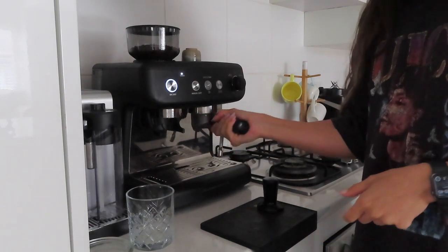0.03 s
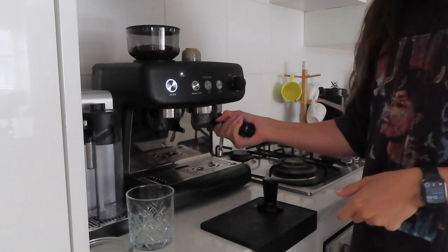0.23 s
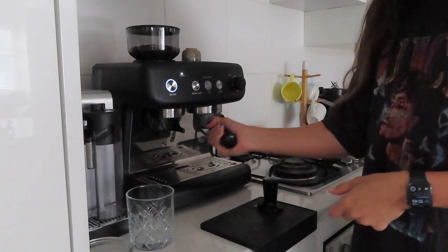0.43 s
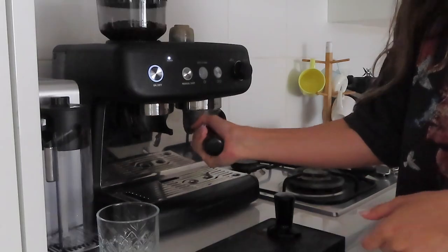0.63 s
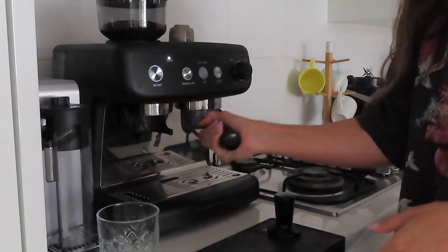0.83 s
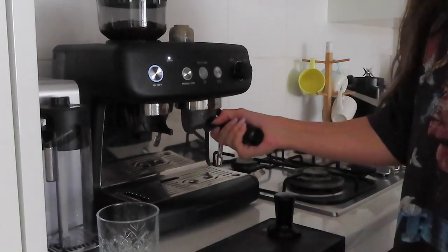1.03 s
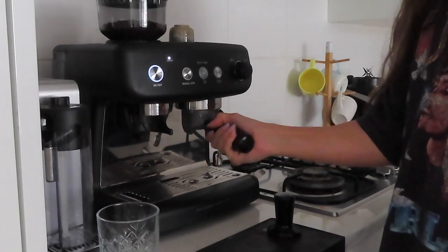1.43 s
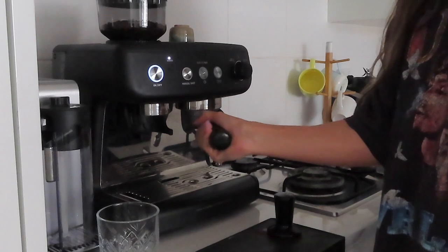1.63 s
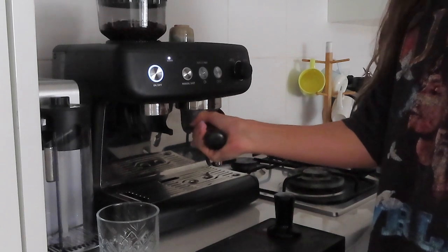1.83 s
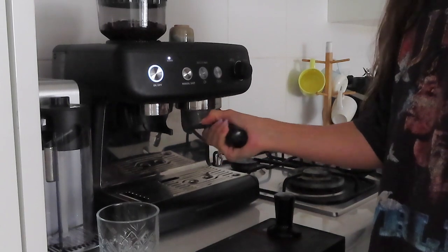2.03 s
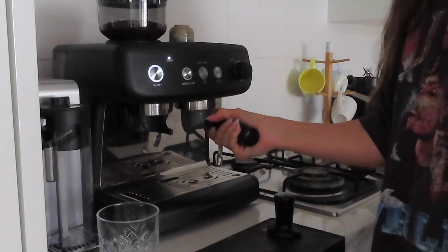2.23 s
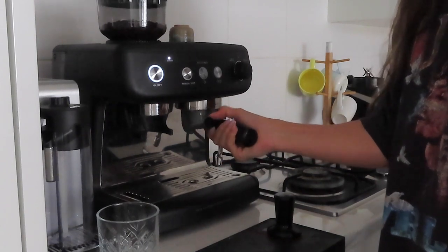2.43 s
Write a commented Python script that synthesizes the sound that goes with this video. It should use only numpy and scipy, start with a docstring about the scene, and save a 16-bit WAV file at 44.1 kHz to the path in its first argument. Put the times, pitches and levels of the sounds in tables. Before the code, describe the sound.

A metal portafilter clunks and knocks as it is locked into an espresso machine.

```python
"""A quiet, hard-walled kitchen, where a metal portafilter is fitted to an espresso machine.
It slides up with a faint rub of friction, clunks against the group head and knocks about until its
lugs seat. As it is twisted tight the seal ticks and the lugs slip and catch in a few dull bumps.
Impacts excite the damped modes of housing and basket; early reflections and reverberation follow,
over a steady low rumble and hiss."""
import sys
import numpy as np
from scipy import signal
from scipy.io import wavfile
from scipy.ndimage import uniform_filter1d

SR = 44100
rng = np.random.default_rng(int(sys.argv[2]) if len(sys.argv) > 2 else 0)


def generate_wav(sig):
    """Save sig (samples, or channels by samples) to the path in sys.argv[1] as 16-bit PCM at SR."""
    pcm = np.round(np.clip(np.atleast_2d(sig).T, -1, 1) * 32767).astype(np.int16)
    wavfile.write(sys.argv[1], SR, pcm)


N = 110250
AGE = np.arange(3 * SR // 4) / SR  # time since a contact, in seconds
BAND_EDGES_HZ = 22 * 2 ** (np.arange(20) / 2)

# background noise of the kitchen: frequency_hz, octave_level_db
AIR_SPECTRUM = [(25, -80), (35, -64.5), (50, -52), (75, -58), (110, -54), (160, -52.5), (300, -55),
                (700, -57), (1400, -60.5), (3000, -62.5), (6000, -65.5), (10000, -73), (15000, -79)]
# its stereo width: frequency_hz, side_to_mid_db
AIR_WIDTH = [(40, -25.5), (400, 0), (1500, -3), (3000, -3.5), (6000, -5.5), (12000, -3)]
# early reflections from counter and cupboards: frequency_hz, relative_to_direct_db
EARLY_LEVEL = [(100, -15.5), (700, -8.5), (2500, -16), (7000, 0.5), (14000, -4.5)]
# reverberation of the room: frequency_hz, relative_to_direct_db
ROOM_LEVEL = [(100, -5.5), (300, -6), (800, 1), (2000, -3), (4000, -6.5), (7500, -4), (14000, -15)]
# its decay: frequency_hz, t60_s
ROOM_T60 = [(100, 1), (260, 0.57), (700, 0.71), (1840, 0.53), (4850, 0.57), (12800, 0.51)]
# stereo width of all reflected sound: frequency_hz, side_to_mid_db
ROOM_WIDTH = [(100, -30.5), (1000, -21.5), (2800, -15), (5500, -7), (12000, 0.5)]
EARLY_T60_S, EARLY_BUILD_S, ROOM_BUILD_S, DIRECT_WIDTH_DB = 0.1, 0.0035, 0.018, -28.5

# the rim slides on the group head; the last two columns are relative to the main resonance:
# start_s, length_s, level_db, resonance_hz, upper_ring_db, grit_db
SLIDES = [(0.161, 0.14, -55.5, 3140, -12, 0), (0.439, .13, -73.5, 5200, -13, 14),
          (1.437, 0.12, -71.5, 3470, -16, 5.5), (2.32, 0.1, -58, 2440, -30, -23)]
SLIDE_WIDTH_HZ, UPPER_RING_HZ, UPPER_WIDTH_HZ = 420, 6700, 700
GRIT_BAND_HZ, SLIDE_FADE_S = [1500, 6500], 0.024

# dense, quickly damped modes of the machine: frequency_hz, t60_s
CLATTER_T60 = [(100, 0.17), (450, 0.092), (1400, 0.039), (3500, 0.022), (12000, 0.012)]
# distinct modes of the housing: pitch_hz, level_db, t60_s
HOUSING_MODES = [(196.3, -1, .33), (393, -8.5, 0.1), (465.5, -7, 0.27), (495, -12.5, 0.29),
                 (545, -13, 0.39), (723, -4.5, 0.3), (834, -8.5, 0.32), (974, -13.5, 0.6),
                 (1072, -16.5, 0.53), (1250, -25.5, 0.62), (2015, -23, 0.14), (2410, -11.5, 0.2),
                 (3829, -7, 0.1), (4180, -5.5, .07), (5530, -17, .1)]
# hollow boom of the machine on the counter: pitch_hz, level_db, t60_s
BOOM_MODES = [(142.3, 2.5, .24)]
# modes of the portafilter and its basket: pitch_hz, level_db, t60_s
BASKET_MODES = [(295.8, 2.5, 0.43), (387, -4, 0.24), (567.8, -4, 0.25), (683, -15, 0.33), (1148, -15, 0.28),
                (1470, -9, .36), (1540, -6.5, 0.18), (1616, -13, 0.27), (2360, -19, .08), (2854, -8, 0.2),
                (3160, 0, 0.044), (3228, -5, 0.049), (4770, -18, 0.14), (7240, -0.5, 0.064),
                (7350, -9, 0.17), (12900, -2, .06)]
RING_SPREAD_DB = 3.5  # each blow shares itself differently among the modes
RADIATION_HZ = 124  # below this the machine hardly radiates
HARDNESS_FROM_HZ = 1600  # above this the basket's ring follows the colour of the blow

# the seal ticks as it takes the load: start_s, gain_db
SEAL_TICKS = [(1.679, -57), (1.686, -71)]
# spectrum of a tick: frequency_hz, level_db
TICK_SPECTRUM = [(70, 18), (1200, 0), (3000, -1), (8000, -11), (13000, -5), (16000, -8)]
# the lugs slip and catch as the handle is twisted: start_s, gain_db
LUG_BUMPS = [(1.706, -33), (1.7150, -33.5), (1.7360, -35), (1.7630, -34), (1.9525, -37.5), (1.9750, -44),
             (2.4800, -36)]
# spectrum of a bump: frequency_hz, level_db
BUMP_SPECTRUM = [(70, -21), (140, 6), (200, -4.5), (400, 4), (750, -4.5), (1100, -8.5), (1700, -34),
                 (3000, -41), (15000, -46)]
BUMP_HOUSING_DB, BUMP_ROOM_DB = -3.5, -4.5
# metal strikes metal; five levels set the colour of the blow, and housing_db is relative to it:
# start_s, thud_db, body_db, clank_db, click_db, sparkle_db, housing_db, boom_db, basket_db, room_db
KNOCKS = [ (-0.030, -26.5, -31.5, -33, -44, -51, -9, -54, -39, 2),
          (0.2340, -36, -18.5, -44, -69, -79, -15, -57, -55, -17),
          (0.2426, -21.5, -12, -22, -18.5, -33.5, 1, -26, -47, -1),
          (0.2578, -34, -18, -24, -39, -54, -23, -35, -55, 0.5),
          (0.4860, -21.5, -23.5, -33, -46, -82, -1.5, -32, -39.5, -0.5),
          (0.5066, -25, -28.5, -46, -57, -75, -9, -36, -57, -4),
          (0.639, -42, -67, -67, -74, -88, -5, -38.5, -50.5, 3),
          (0.7200, -29, -29.5, -42, -45, -63.5, -0.5, -22, -63, 3),
          (0.7465, -27.5, -35, -56, -59, -68, -3.5, -25.5, -62, 13),
          (0.7690, -41, -30, -43, -44, -70, -4.5, -54, -55, 9),
          (0.7881, -18, -23, -18, -27.5, -51.5, -14, -57, -16.5, -1),
          (0.9414, -22.5, -25.5, -23.5, -37.5, -70, -6.5, -25, -29.5, -1), ]
# where thud, body, clank, click and sparkle lie: frequency_hz
COLOUR_HZ = [150, 480, 1400, 3500, 12000]
# spectral shape common to the clatter of all knocks: frequency_hz, gain_db
KNOCK_SPECTRUM = [(70, -40), (105, -22.5), (150, -2), (220, -2.5), (330, -0.5), (480, 4), (720, -5.5),
                  (1000, 3), (1450, -0.5), (2000, -2), (3000, -4), (5000, -6), (7300, -3), (10000, -7.5),
                  (15000, -3)]


def from_db(db):
    """Amplitude ratio: a factor of ten for every 20 dB."""
    return 10 ** (np.asarray(db) / 20)


def rms_one(x):
    """Normalisation to unit mean power."""
    return x / np.sqrt(np.mean(x ** 2) + 1e-20)


def at_hz(points, hz):
    """Interpolation of a table on a log-frequency axis."""
    frequencies, values = np.transpose(points)
    return np.interp(np.log(hz), np.log(frequencies), values)


def add(out, start_s, sound):
    """Superposition: a sound adds to the mix from start_s on."""
    start = int(round(start_s * SR))
    first, end = max(start, 0), min(start + sound.shape[-1], N)
    out[:, first:end] += sound[..., first - start:end - start]


def bands():
    """Half-octave filter bank: each band's geometric centre and its band-pass."""
    return [(np.sqrt(low * high), signal.butter(2, [low, high], "band", fs=SR, output="sos"))
            for low, high in zip(BAND_EDGES_HZ, BAND_EDGES_HZ[1:])]


def stereo(pair, width_db):
    """Mid-side stereo: left is the sum, right the difference."""
    return pair[0] + from_db(width_db) * pair[1] * np.array([[1], [-1]])


def kitchen_air():
    """Stationary noise: independent bands add in power to a low rumble and faint hiss."""
    out = np.zeros((2, N))
    for hz, band in bands():
        noise = rms_one(signal.sosfilt(band, rng.standard_normal((2, N))))
        gain = from_db(at_hz(AIR_SPECTRUM, hz)) / np.sqrt(2)  # half an octave, half the power
        out += gain * stereo(noise, at_hz(AIR_WIDTH, hz))
    return out


def resonance(force, hz, width_hz):
    """Forced response of a damped oscillator, scaled to rms 1."""
    radius = np.exp(-np.pi * width_hz / SR)
    feedback = [1, -2 * radius * np.cos(2 * np.pi * hz / SR), radius ** 2]
    return rms_one(signal.lfilter([1, 0, -1], feedback, force))


def rim_friction():
    """Sliding friction: fine random impulses drive two resonances of the rim and are heard as grit."""
    out = np.zeros((2, N))
    grit_band = signal.butter(2, GRIT_BAND_HZ, "band", fs=SR, output="sos")
    for start_s, length_s, level_db, hz, upper_db, grit_db in SLIDES:
        grains = rng.standard_normal((2, len(AGE))) * rng.exponential(1, (2, len(AGE)))
        grit = from_db(grit_db) * rms_one(signal.sosfilt(grit_band, grains))
        upper_ring = from_db(upper_db) * resonance(grains, UPPER_RING_HZ, UPPER_WIDTH_HZ)
        rub = resonance(grains, hz, SLIDE_WIDTH_HZ) + upper_ring + grit
        stroke = np.clip(np.minimum(AGE, length_s + SLIDE_FADE_S - AGE) / SLIDE_FADE_S, 0, 1)
        add(out, start_s, from_db(level_db) * stroke * stereo(rub, width_db=-15))
    return out


def burst_power(t60_s, build_s=0):
    """Exponential build-up and decay of power, holding the energy of 5 ms at rms 1."""
    rise = 1 - np.exp(-AGE / (build_s + 1e-6))
    power = (rise * (from_db(-60 * AGE / t60_s) + 1e-9)) ** 2
    return power / power.sum() * .005 * SR


def diffuse_response():
    """Overlapping modes act as noise: per band, a carrier and its direct, early and room power decays."""
    response = []
    for hz, band in bands()[3:]:
        noise = signal.sosfilt(band, rng.standard_normal((2, N)))
        local_power = uniform_filter1d(noise ** 2, size=int(SR * (.002 + 2 / hz)), axis=1)
        carrier = noise / np.sqrt(local_power + 1e-12)
        direct = burst_power(at_hz(CLATTER_T60, hz))
        early = from_db(at_hz(EARLY_LEVEL, hz)) ** 2 * burst_power(EARLY_T60_S, EARLY_BUILD_S)
        room = from_db(at_hz(ROOM_LEVEL, hz)) ** 2 * burst_power(at_hz(ROOM_T60, hz), ROOM_BUILD_S)
        response.append((hz, band, carrier, direct, early, room))
    return response


def clatter(response, spectra, room_db):
    """An impact excites the dense modes afresh; direct and reflected sound add in power."""
    mid_side = np.zeros((2, len(AGE)))
    offset = rng.integers(SR // 8, N - len(AGE))
    for hz, band, carrier, direct, early, room in response:
        reflected = early + from_db(room_db) ** 2 * room
        side = from_db(DIRECT_WIDTH_DB) ** 2 * direct + from_db(at_hz(ROOM_WIDTH, hz)) ** 2 * reflected
        burst = carrier[:, offset:offset + len(AGE)] * np.sqrt([direct + reflected, side])
        band_db = sum(at_hz(spectrum, hz) for spectrum in spectra)
        mid_side += from_db(band_db) * signal.sosfilt(band, burst)
    return stereo(mid_side, width_db=0)


def free_modes(table):
    """Free vibration: damped sines of alternating sign, whose deep bass radiates poorly."""
    sines = [(-1) ** k * from_db(db - 60 * AGE / t60_s) * np.sin(2 * np.pi * hz * AGE)
             for k, (hz, db, t60_s) in enumerate(table)]
    return signal.sosfilt(signal.butter(2, RADIATION_HZ, "high", fs=SR, output="sos"), sines)


def ring(modes, level_db):
    """Modal superposition: each mode is struck with a strength scattered about level_db."""
    return from_db(level_db + RING_SPREAD_DB * rng.standard_normal(len(modes))) @ modes


def portafilter():
    """Impact and stick-slip excitation: the spectrum of each knock, bump or tick weights the modes."""
    out, response = np.zeros((2, N)), diffuse_response()
    housing, boom, basket = free_modes(HOUSING_MODES), free_modes(BOOM_MODES), free_modes(BASKET_MODES)
    housing_hz, basket_hz = np.array(HOUSING_MODES)[:, 0], np.array(BASKET_MODES)[:, 0]
    for start_s, *colour_db, housing_db, boom_db, basket_db, room_db in KNOCKS:
        colour = list(zip(COLOUR_HZ, colour_db))
        # a soft contact excites the basket's high modes less
        treble_db = at_hz(colour, np.maximum(basket_hz, HARDNESS_FROM_HZ))
        hardness_db = treble_db - at_hz(colour, HARDNESS_FROM_HZ)
        ringing = ring(housing, housing_db + at_hz(colour, housing_hz))
        ringing += ring(boom, boom_db)
        ringing += ring(basket, basket_db + hardness_db)
        add(out, start_s, clatter(response, [colour, KNOCK_SPECTRUM], room_db) + ringing)
    for start_s, gain_db in LUG_BUMPS:
        ringing = ring(housing, gain_db + BUMP_HOUSING_DB + at_hz(BUMP_SPECTRUM, housing_hz))
        bump = from_db(gain_db) * clatter(response, [BUMP_SPECTRUM], BUMP_ROOM_DB)
        add(out, start_s, bump + ringing)
    for start_s, gain_db in SEAL_TICKS:
        add(out, start_s, from_db(gain_db) * clatter(response, [TICK_SPECTRUM], room_db=1))
    return out


def scene():
    """Linear superposition of impacts, friction and background noise."""
    return portafilter() + rim_friction() + kitchen_air()


def record(dry):
    """Band limiting: a steep elliptic low-pass removes the highest treble."""
    cutoff_hz = 15600
    return signal.sosfilt(signal.ellip(10, .1, 80, cutoff_hz, fs=SR, output="sos"), dry)


dry = scene()
out = record(dry)
generate_wav(out)
```